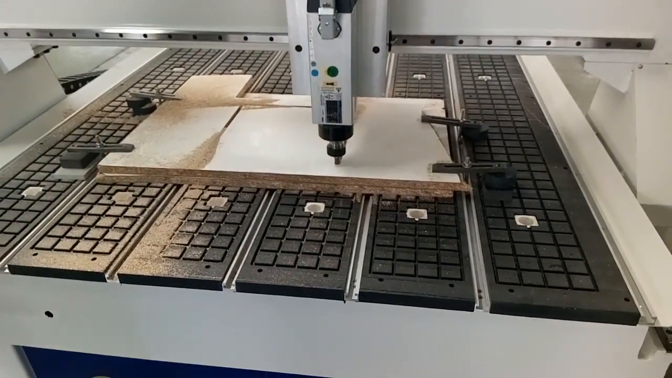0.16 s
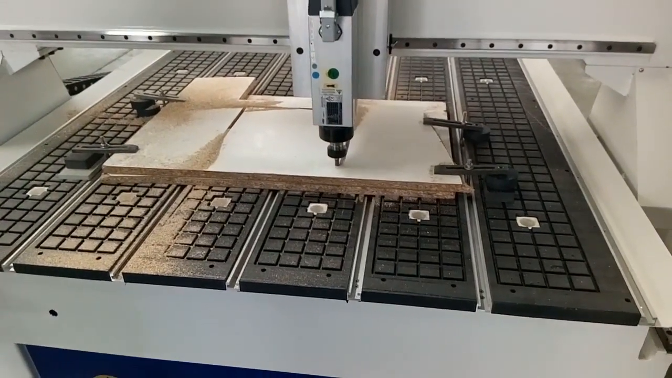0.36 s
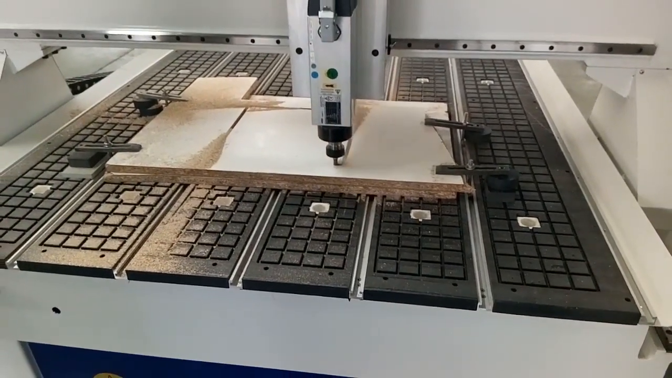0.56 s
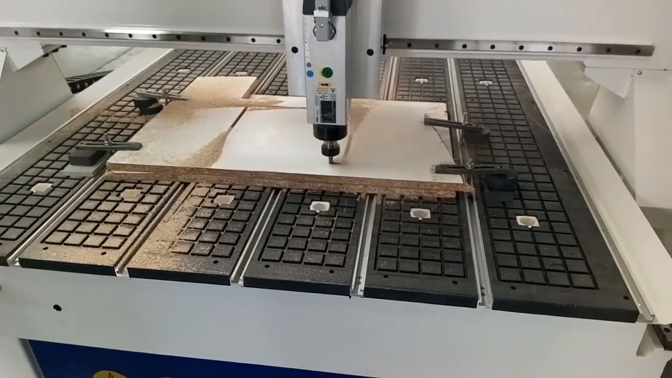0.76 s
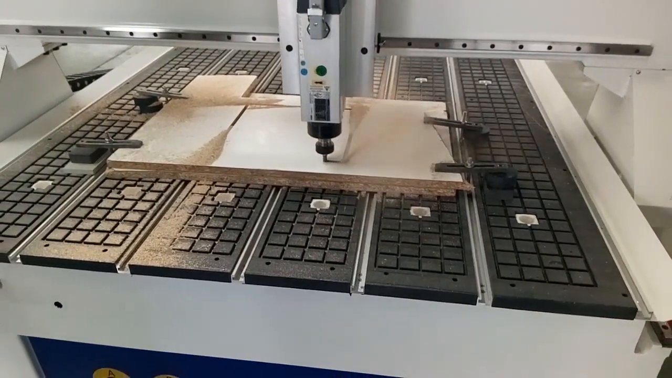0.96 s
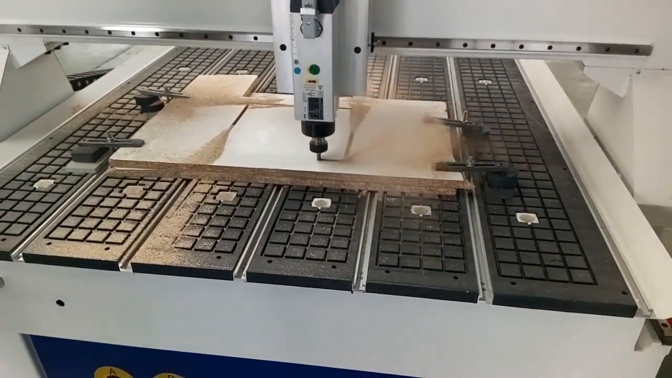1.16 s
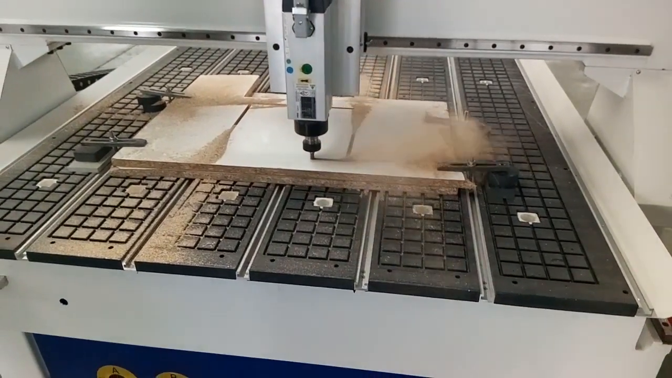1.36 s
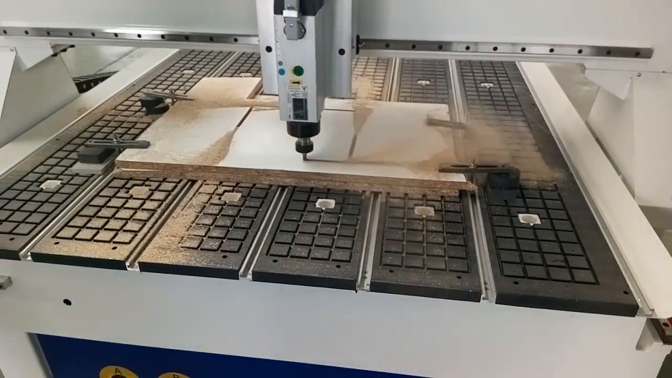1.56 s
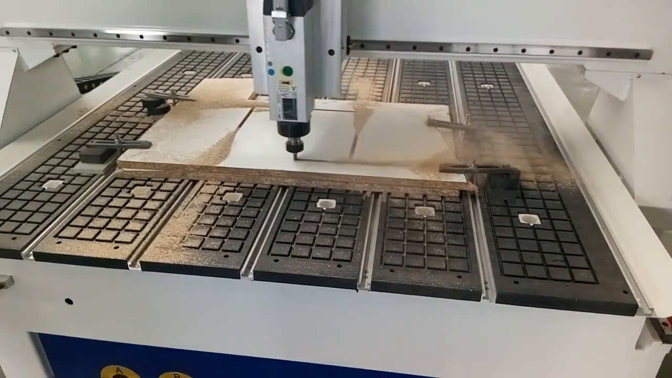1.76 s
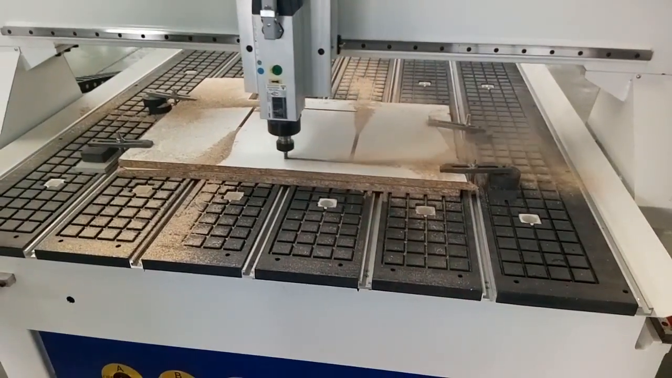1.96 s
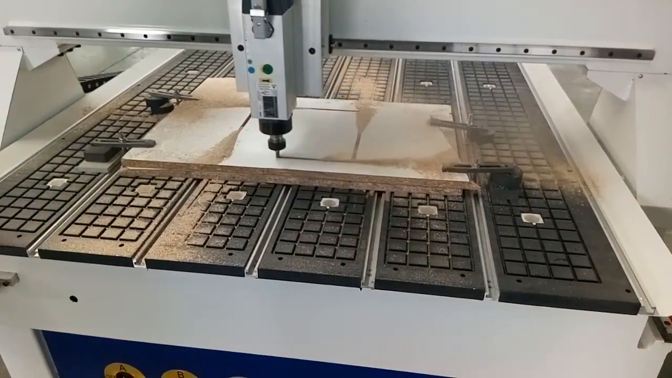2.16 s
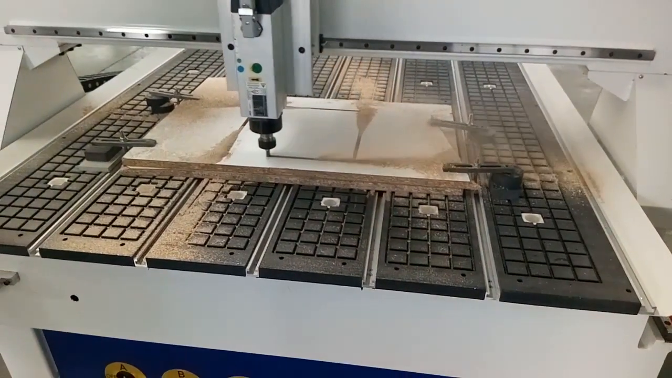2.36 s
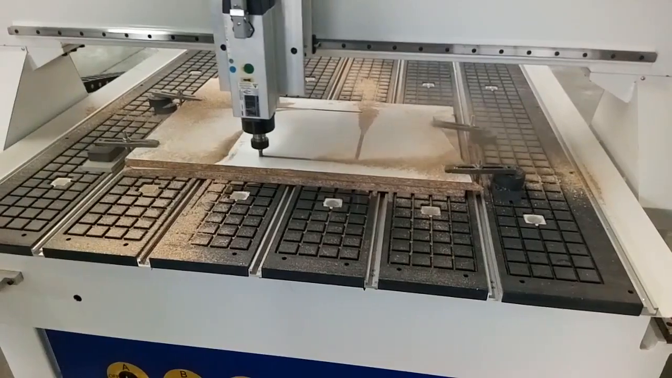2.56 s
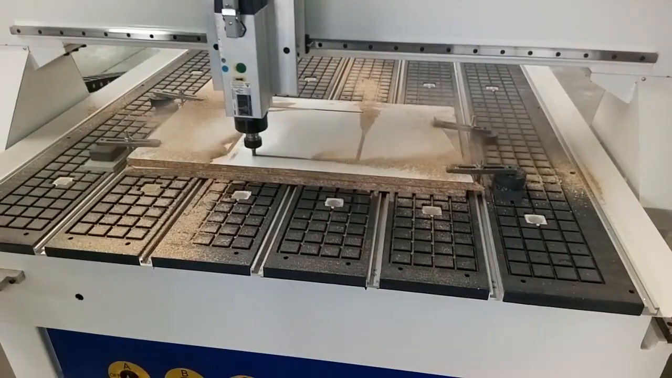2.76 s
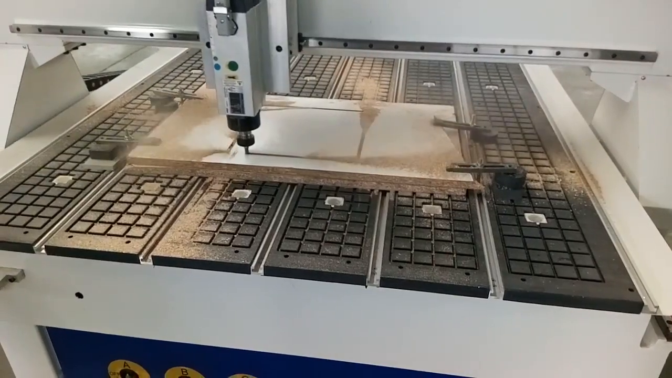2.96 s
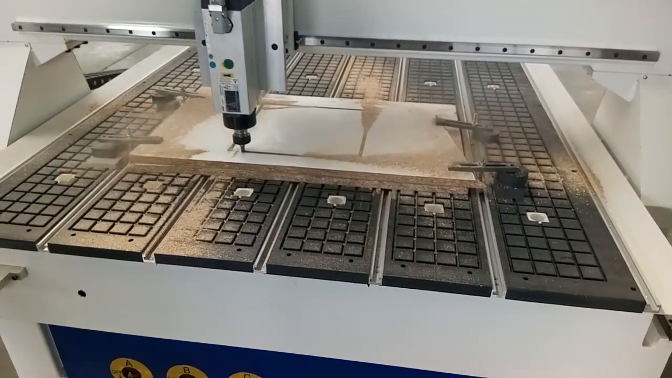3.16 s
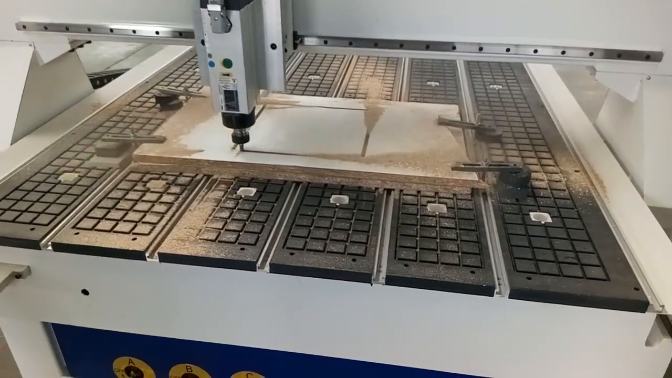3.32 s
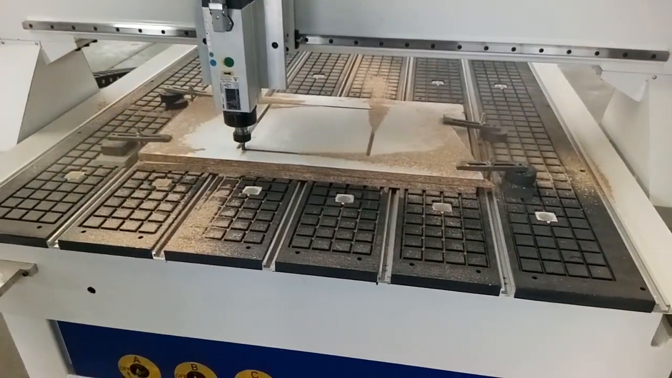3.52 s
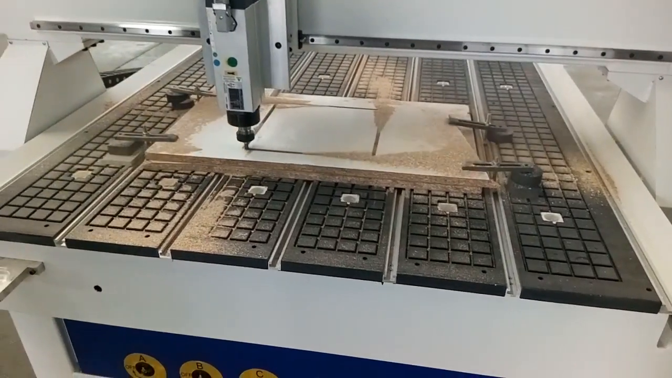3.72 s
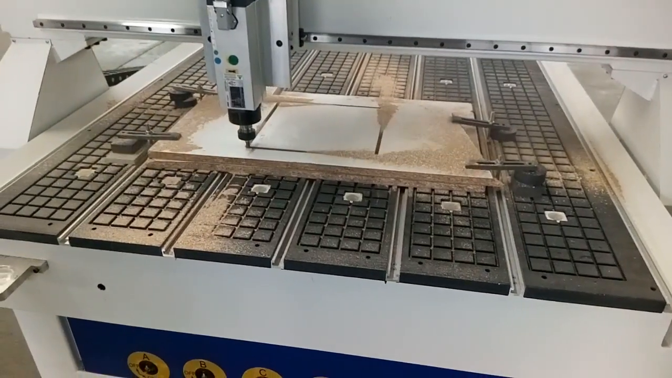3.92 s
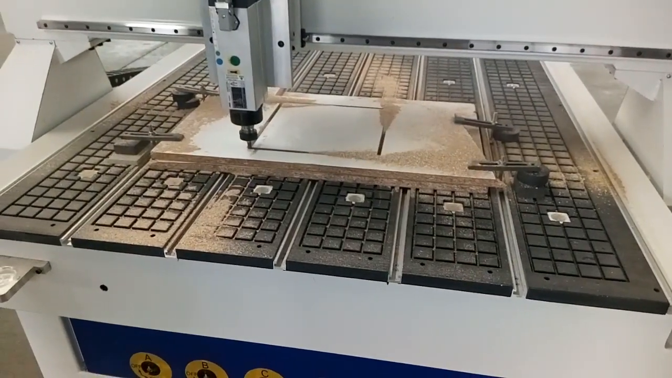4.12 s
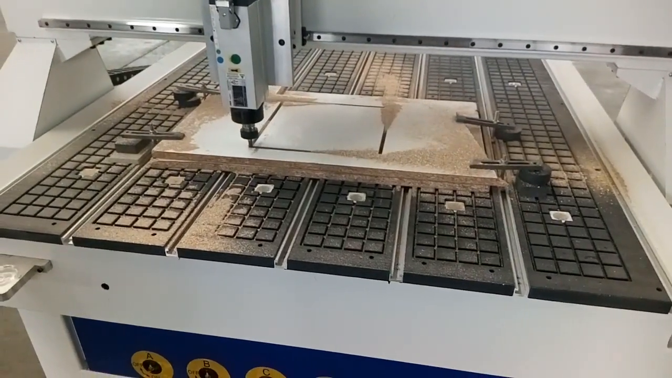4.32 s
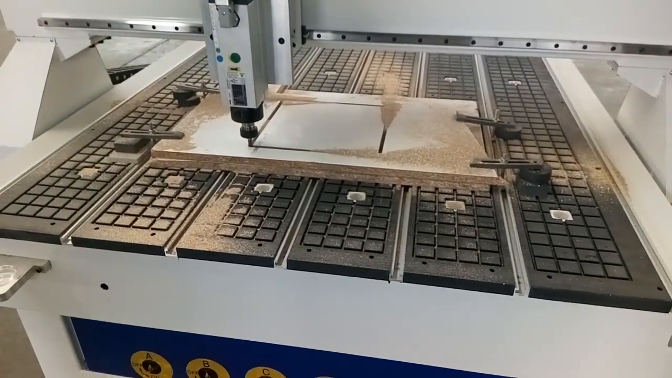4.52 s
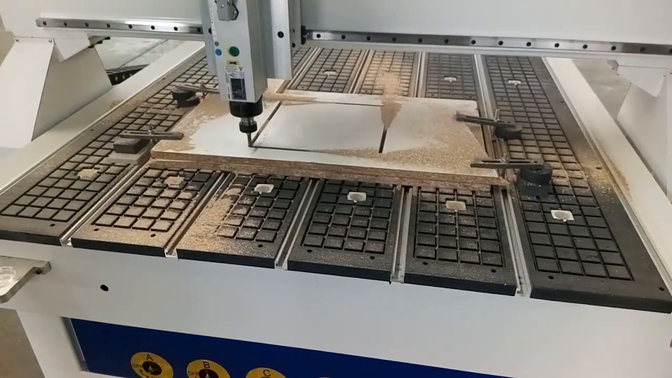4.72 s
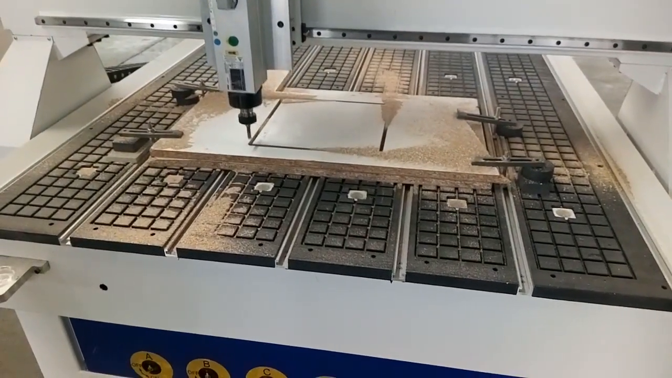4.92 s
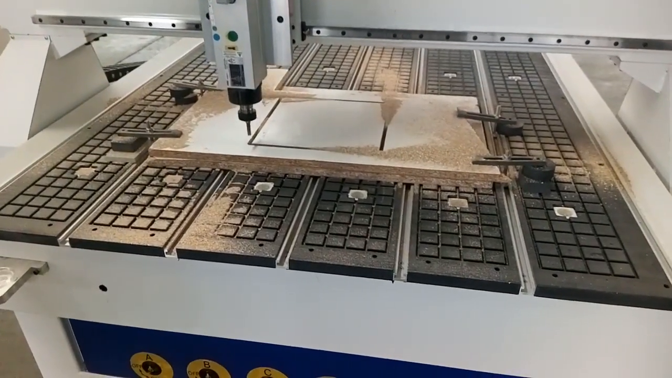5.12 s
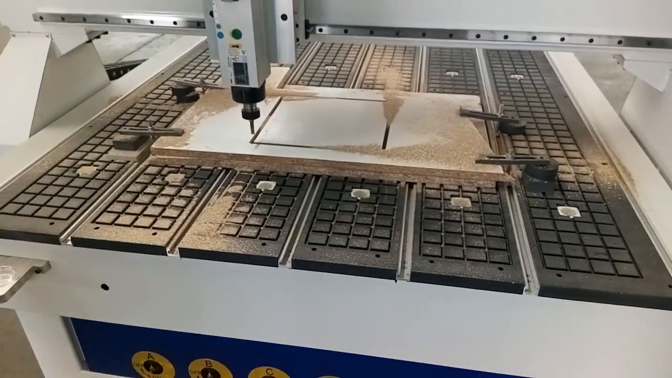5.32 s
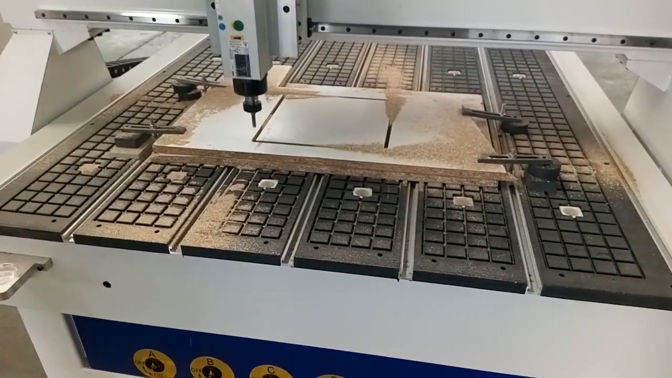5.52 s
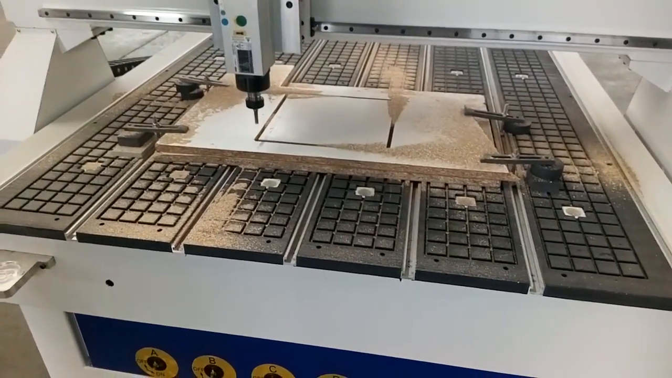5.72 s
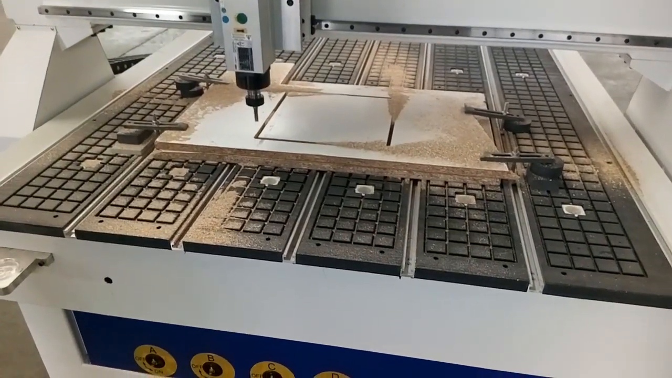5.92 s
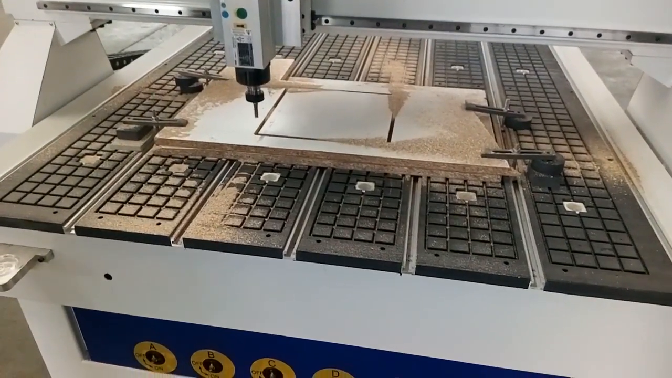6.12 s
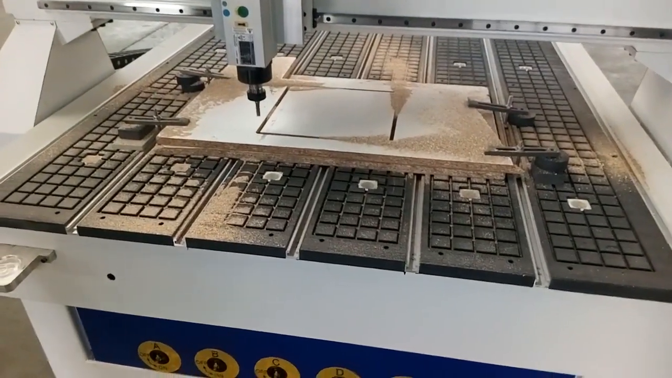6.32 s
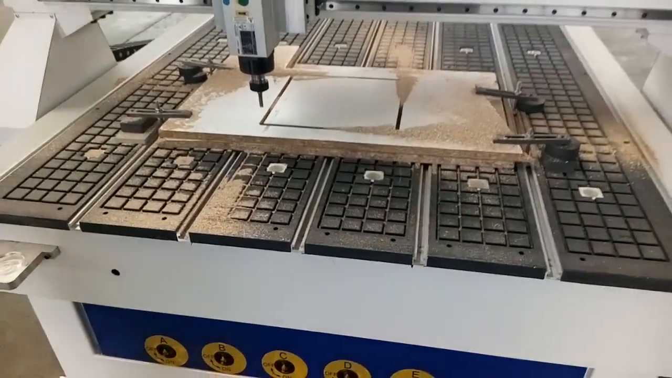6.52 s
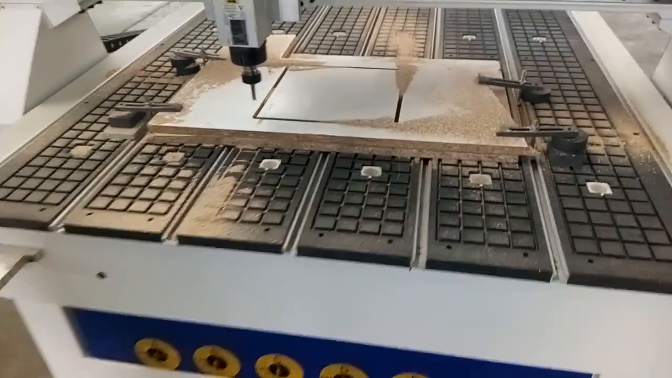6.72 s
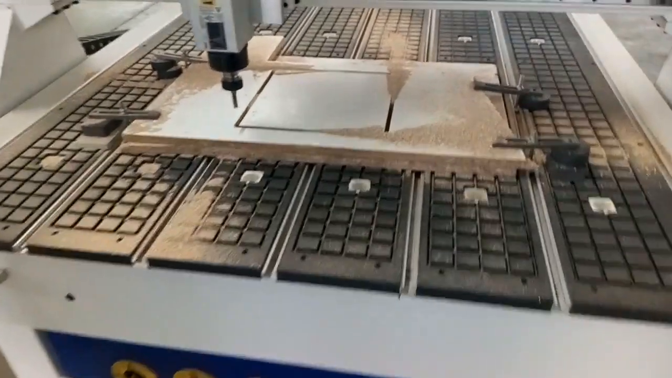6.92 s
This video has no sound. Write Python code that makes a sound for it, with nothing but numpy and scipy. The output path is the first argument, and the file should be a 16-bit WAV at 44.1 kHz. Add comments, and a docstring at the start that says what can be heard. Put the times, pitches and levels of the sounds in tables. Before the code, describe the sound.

Close, shrill machine squeal and gritty wood cutting, a brief stutter as the bit lets go, airy hiss, a falling spindle whine, final low bumps.

```python
"""A CNC router plunges a two-flute cutter into a board, then feeds it sideways, heard from close by in mono.
It squeals in its bending mode, with sidebands at multiples of the shaft rate, over a rasp of chip noise.
The feed stops, the squeal turns loose and stutters; the cutter lets go and grazes its groove as air hisses.
The spindle brakes, its falling fan whine beating against the room's echo, and the drive whistles faintly.
Last, the frame rumbles and bumps as the gantry moves off."""
import sys
import numpy as np
from scipy import signal
from scipy.fft import rfft, irfft, next_fast_len
from scipy.io import wavfile
from scipy.ndimage import uniform_filter1d, minimum_filter1d

SR = 44100
rng = np.random.default_rng(int(sys.argv[2]) if len(sys.argv) > 2 else 0)


def put_to_file(sound):
    """Save the sound as 16-bit audio at rate SR, in the file named by the first command-line argument."""
    columns = np.atleast_2d(sound).T  # one column per channel
    safe = np.clip(columns, -1, 1)
    whole_steps = np.round(safe * 32767)
    wavfile.write(sys.argv[1], SR, whole_steps.astype(np.int16))


N = 312212
TIME = np.arange(N) / SR

# job: plunge turns into feed, feed stops, cutter lets go, clears the groove, spindle brakes
FEED_S, STOP_S, LET_GO_S, CLEAR_S, BRAKE_S = 0.52, 3.83, 4.125, 4.5, 5.42

# fan and workshop drone spectrum: (frequency [Hz], relative level [dB])
DRONE_COLOUR = [(30, -19), (55, -9), (120, 0.5), (230, -2), (420, -7), (680, -5.5), (1050, -7), (1800, -10),
                (4000, -8.5), (6700, -3.5), (7700, -19), (9200, -31.5), (13900, -42), (14900, -27.5)]
# housing resonances rung by air: (frequency [Hz], width [Hz], relative level [dB])
HOUSING = [(103.2, 36, -5), (210, 19, -4.5), (651, 190, 0), (1432, 160, -2.5), (2165, 270, -1),
           (2665, 27, -9), (3693, 66, -4.5)]
# drone gain, dipped until about 4 s
DRONE_DB, DRONE_DIP_DB, DRONE_BACK_S, DRONE_RISE_S = -25, -16, 4.03, 0.52
# air blowing across the fresh groove: (time [s], level [dB])
HISS = [(3.8, -56), (4.05, -25.5), (4.42, -21), (4.85, -23), (5.15, -21), (5.55, -28), (5.8, -40),
        (7.08, -57)]
# hiss spectrum: (frequency [Hz], relative level [dB])
HISS_COLOUR = [(1500, -19), (2300, -7.5), (3600, -9.5), (4800, -0.5), (5600, -2), (6500, 2.5), (7200, -3.5),
               (8000, -15.5), (10000, -29), (13800, -34), (15000, -22)]

# frame rumble spectrum: (frequency [Hz], relative level [dB])
GANTRY_COLOUR = [(40, -19), (110, -3), (170, 8), (270, -8), (340, 6.5), (420, 4.5), (520, -3), (900, -25),
                 (3000, -55)]
# bumps in the rumble: (time [s], half length [s], rise [dB])
BUMPS = [(6.868, .03, 5.5), (7.032, 0.026, 12.5)]
GANTRY_S, GANTRY_DB = 6.73, -32.8

# drive switching whistles: (time [s], length [s], pitch [Hz], glide [Hz/s], level [dB])
WHISTLE = [(6.18, .17, 8270, 4800, -59), (6.54, .6, 8920, -1330, -58)]

# spindle speed before braking, sagging under load: (time [s], shaft rate [Hz])
SPEED = [(0, 258.3), (.2, 260.4), (.45, 260), (.6, 258.5), (1, 256.2), (1.4, 255.9), (1.95, 253.1),
         (2.6, 253), (3, 254.8), (3.78, 258), (4.2, 261.4), (5.4, 262.6)]
IDLE_HZ, BRAKE_STEP_HZ, BRAKE_HZ_PER_S = 262.2, 1.3, 29.3
# shaft imbalance, order 1: (time [s], level [dB])
IMBALANCE = [(0, -56.5), (.65, -51.5), (.85, -41), (1.9, -37.5), (2.95, -53.5), (3.2, -38), (3.5, -35.5),
             (3.85, -52), (4.18, -29.5), (5.3, -32), (5.9, -38), (7.08, -45)]
# flutes' note, order 2, swelling and fading as the head travels: (time [s], level [dB])
FLUTES = [(0, -36), (.55, -29.5), (.88, -29.5), (1.18, -45), (1.4, -34), (1.95, -29), (2.2, -46),
          (2.35, -34.5), (2.67, -42.5), (3.25, -24.5), (3.92, -27.5), (4.05, -34.5), (4.6, -43), (5.7, -48),
          (5.9, -36), (7.08, -51)]
# flutes' octave, order 4: (time [s], level [dB])
FLUTE_OCTAVE = [(.3, -51), (1.15, -35), (1.98, -32), (2.25, -55), (2.5, -40.5), (3.5, -38), (3.8, -49.5),
                (3.92, -38.5), (4.4, -36.5), (4.6, -54), (7.08, -53)]
# flutes' double octave, order 8: (time [s], level [dB])
FLUTE_TOP = [(.3, -53), (1.2, -31), (1.55, -45), (1.98, -31), (2.32, -29.5), (2.65, -50), (2.95, -34),
             (3.85, -34.5), (4.03, -41), (4.35, -33.5), (4.55, -46), (7.08, -49)]
# fan whine, order 6: (time [s], level [dB])
FAN = [(0, -40.5), (.5, -36.5), (.82, -29), (1.45, -41.5), (3.8, -34), (3.93, -28.5), (4.03, -29.5),
       (4.17, -22.5), (4.45, -29), (4.8, -25), (5, -37.5), (5.2, -28.5), (5.43, -25.5), (5.48, -19.5),
       (6.18, -20.5), (6.5, -36.5), (7.08, -39)]
# fan octave, order 12: (time [s], level [dB])
FAN_OCTAVE = [(.42, -42), (.53, -33.5), (.95, -27.5), (1.45, -41.5), (3.45, -33.5), (3.75, -46),
              (4.4, -31.5), (5.6, -31), (5.85, -28.5), (6.2, -43), (6.6, -32.5), (7.08, -51)]

# tones of the grazing cutter: (shaft order, relative level [dB])
BRUSH_TONES = [(16, -2), (17, -5), (18, 0.5), (19, -1), (20, -5.5), (22, -6), (24, 0)]

# chip noise spectrum: (frequency [Hz], relative level [dB])
RASP_COLOUR = [(150, -26), (600, -13), (1100, -20), (1680, -19.5), (2350, -8.5), (2900, -13), (3900, -8.5),
               (4600, -4.5), (5400, -10), (6700, -2.5), (7600, -11.5), (9000, -29.5), (13900, -41.5),
               (14900, -22)]
# board and cutter resonances: (frequency [Hz], width [Hz], relative level [dB])
BOARD = [(149, 30, -16), (2300, 1400, -4.5), (4070, 200, -8), (4850, 730, 4.5), (6630, 810, -1.5)]
# overtones of the flutes' blows: (shaft order, relative level [dB])
BLOWS = [(5, -33.5), (7, -34.5), (9, -30.5), (10, -18), (14, -16), (16, -17), (18, -16), (20, -31),
         (22, -19.5), (24, -21), (26, -28), (28, -30)]
# cutting gain: rises with the speed sag, lower in the plunge
RASP_DB, RASP_DB_PER_HZ, PLUNGE_DB = -26, 0.4432, -1.5
RASP_END_S, RASP_FADE_S = 4.21, 0.61
HARD_SPOT_S, HARD_SPOT_WIDTH_S, HARD_SPOT_DB = 1.903, 0.13, 3

# cutter's bending mode before it turns loose: (time [s], pitch [Hz])
CHATTER = [(0, 4796), (.35, 4798), (.48, 4816), (1, 4790), (1.5, 4795), (1.9, 4784), (2.8, 4782),
           (3.2, 4796), (3.81, 4797)]
# squeal at that mode: (time [s], level [dB])
SQUEAL = [(0.0, -8.5), (0.13, -10), (0.43, -7), (0.63, -15.5), (0.69, -12), (0.86, -14), (0.9, -12.5),
          (1.43, -10), (1.79, -14), (1.86, -18.5), (2.0, -12.5), (2.15, -12), (2.32, -18), (2.4, -13),
          (2.79, -11), (3.13, -14), (3.68, -9.5), (3.8, -10.5)]
# loose cutter catching the wall: (time [s], length [s], level [dB], level slope [dB/s])
CATCHES = [(3.865, 0.07, -16.5, -8), (3.94, 0.13, -15, -50), (4.158, 0.32, -26, -32)]
# (orders from mode, level plunging [dB], feeding [dB], as feed stops [dB], as cutter lets go [dB])
INNER_SIDEBANDS = [(-2, -29.5, -24.5, -29, -25), (-1, -30.5, -32.5, -30, -18.5), (2, -24, -22, -22, -28.5),
                   (4, -28, -29.5, -35, -39)]
# sideband six orders up: (time [s], level [dB])
BRIGHT_SIDEBAND = [(0, -22.5), (.9, -21.5), (1.3, -26.5), (1.75, -19), (2.1, -20.5), (2.6, -37), (3.1, -36),
                   (3.45, -22.5), (3.88, -40), (3.97, -23), (4.12, -28)]
# outer sidebands: (shaft orders from mode, relative level [dB])
SIDEBANDS = [(-10, -30), (-8, -34), (-6, -25.5), (-4, -25), (-3, -46), (1, -25), (3, -26), (5, -24),
             (7, -23), (8, -16), (9, -35.5), (10, -22), (11, -34), (12, -36), (13, -41), (14, -37)]
# lines around twice the mode: (shaft orders from there, relative level [dB])
OVERTONES = [(-4, -43), (-2, -52), (-1, -60), (0, -49), (1, -52), (2, -57), (3, -58), (4, -64), (6, -48.5),
             (7, -61), (8, -55.5), (9, -54), (10, -57)]
# pitch steps up when loose, then rises until the cutter lets go
LOOSE_STEP_HZ, LOOSE_RISE_HZ = 33.8, 57.75
# the squeal dips briefly
DIP_S, DIP_WIDTH_S, DIP_DB = 3.2, 0.012, -6.5

PEAK_LIMIT, LIMITER_S, TOP_HZ = 0.9, 0.003, 15480


def undb(db):
    """Decibels to gain."""
    return 10 ** (np.asarray(db) / 20)


def curves(table):
    """Each column after time as a signal, joined by straight lines."""
    s, *columns = np.transpose(table)
    return [np.interp(TIME, s, column) for column in columns]


def ramp(at, length):
    """Linear change from 0 to 1, centred on a moment."""
    return np.clip((TIME - at) / length + 0.5, 0, 1)


def held(start, end, attack, release):
    """Attack, hold and release, from 0 to 1 and back."""
    return ramp(start, attack) * (1 - ramp(end, release))


def swell(at, width):
    """Bell-shaped rise to 1 around a moment."""
    return np.exp(-((TIME - at) / width) ** 2)


def unit(x):
    """Scale to rms 1."""
    return x / np.sqrt(np.mean(x ** 2))


def walk(rate_hz):
    """Smooth random wandering of rms 1."""
    k = max(int(SR / rate_hz), 2)
    steps = np.repeat(rng.standard_normal(N // k + 2), k)
    return unit(uniform_filter1d(steps, k)[:N])


def noise(gain):
    """Noise of rms 1 whose amplitude spectrum follows gain(Hz)."""
    size = next_fast_len(N)
    hz = np.maximum(np.arange(size // 2 + 1) * SR / size, 1)
    spectrum = rfft(rng.standard_normal(size)) * gain(hz)
    return unit(irfft(spectrum, size)[:N])


def coloured(points):
    """Noise with a spectrum joining (frequency [Hz], level [dB]) points."""
    f, db = np.transpose(points)
    return noise(lambda hz: undb(np.interp(np.log(hz), np.log(f), db)))


def resonant(modes):
    """Noise ringing in (frequency [Hz], width [Hz], level [dB]) resonances."""
    def gain(hz):
        power = sum(undb(db) ** 2 / w / (1 + (2 * (hz - f) / w) ** 2) ** 2 for f, w, db in modes)
        return np.sqrt(power)
    return noise(gain)


def angle(hz):
    """Running phase [rad] of something that turns at hz."""
    return 2 * np.pi * np.cumsum(hz) / SR


def tone(phase, db):
    """Sine at an rms level, with a random starting phase."""
    return np.sqrt(2) * undb(db) * np.sin(phase + 2 * np.pi * rng.random())


def stack(base, shaft, rows, fade_db, fade_rate_hz):
    """Lines whole shaft orders from a base phase, each fading on its own."""
    return sum(tone(base + round(order) * shaft, db + fade_db * np.tanh(walk(fade_rate_hz)))
               for order, db in rows)


def air(housing_db=-6.0, flicker_db=0.7, plunge_db=3.5, thin_hz=110, thin_share=0.55):
    """Fan air drones and rings the housing, held low and thin until about 4 s; air hisses over the groove."""
    drone = coloured(DRONE_COLOUR) * undb(flicker_db * walk(12)) + undb(housing_db) * resonant(HOUSING)
    dipped = 1 - ramp(DRONE_BACK_S, DRONE_RISE_S)
    lows = signal.sosfilt(signal.butter(1, thin_hz, fs=SR, output="sos"), drone)
    drone = drone - thin_share * dipped * lows
    drone_db = DRONE_DB + DRONE_DIP_DB * dipped + plunge_db * (1 - ramp(0.23, 0.5))
    hiss = coloured(HISS_COLOUR) * undb(flicker_db * walk(24.77))
    return undb(drone_db) * drone + undb(curves(HISS)[0]) * hiss


def gantry(judder_db=1.5):
    """The drive shakes the frame as the gantry starts to travel: low noise with bumps."""
    bumps_db = sum(db * swell(s, width) for s, width, db in BUMPS)
    level_db = GANTRY_DB + bumps_db + judder_db * walk(30)
    return coloured(GANTRY_COLOUR) * ramp(GANTRY_S, 0.11) * undb(level_db)


def drive():
    """Switching in the spindle's motor drive whistles in thin glides."""
    return sum(held(s, s + length, 0.05, 0.05) * tone(angle(hz + glide * (TIME - s)), db)
               for s, length, hz, glide, db in WHISTLE)


def room(x, t60_s=1.78, gap_s=0.025):
    """Diffuse late echoes of the workshop: a decaying noise tail of unit energy."""
    t = TIME[:SR]
    tail = rng.standard_normal(SR) * undb(-60 * t / t60_s) * (t > gap_s)
    return signal.fftconvolve(x, tail / np.sqrt(np.sum(tail ** 2)))[:N]


def speed():
    """Shaft rate [Hz]: sags in the cut, then is braked by a small step and a steady fall."""
    step = BRAKE_STEP_HZ * ramp(BRAKE_S + 0.059, 0.13)
    fall = BRAKE_HZ_PER_S * np.maximum(TIME - BRAKE_S, 0)
    return curves(SPEED)[0] - step - fall


def spindle(shaft, flutter_db=1.5, echo_db=-11.5):
    """Imbalance, flutes and fan sing on multiples of the shaft rate."""
    voices = [(1, IMBALANCE), (2, FLUTES), (4, FLUTE_OCTAVE), (8, FLUTE_TOP), (6, FAN), (12, FAN_OCTAVE)]
    whine = sum(tone(k * shaft, curves(table)[0] + flutter_db * walk(35)) for k, table in voices)
    # as the pitch falls, the echo still holds the higher pitch and beats against it
    braking = ramp(BRAKE_S + 0.02, 0.04)
    return whine + undb(echo_db) * room(whine * braking)


def brushing(shaft, graze_db=-29.5, fall_db_per_s=-18, jitter_rad=0.5):
    """The rising cutter grazes its groove ever more lightly: jittered shaft orders, fading."""
    fading = undb(graze_db + fall_db_per_s * np.maximum(TIME - LET_GO_S, 0))
    tones = stack(jitter_rad * walk(110), shaft, BRUSH_TONES, fade_db=4.0, fade_rate_hz=60)
    return fading * held(LET_GO_S, CLEAR_S, 0.097, 0.089) * tones


def cutting(shaft, sag_hz, bite=0.38, grain_db=1.0, board_db=-5.5, chips_db=-2.0,
            blows_db=2.0, blows_plunge_db=-5, repeat=0.32):
    """Two bites a turn tear off chips: puffs of noise that ring the board, and overtones of the blows."""
    puffs = unit(1 + bite * np.cos(2 * shaft)) * undb(grain_db * walk(90))
    rasp = undb(chips_db) * coloured(RASP_COLOUR) + undb(board_db) * resonant(BOARD)
    # similar grain each turn gathers the noise around shaft multiples
    turn_before = np.searchsorted(shaft, shaft - 2 * np.pi)
    rasp = (rasp + repeat * rasp[turn_before]) / np.hypot(1, repeat)
    plunging = 1 - ramp(FEED_S, 0.094)
    hard_spot_db = HARD_SPOT_DB * swell(HARD_SPOT_S, HARD_SPOT_WIDTH_S)
    cut_db = RASP_DB + RASP_DB_PER_HZ * sag_hz + PLUNGE_DB * plunging + hard_spot_db
    blows = stack(0, shaft, BLOWS, fade_db=5.5, fade_rate_hz=4.07)
    blows = undb(blows_db + blows_plunge_db * plunging) * blows
    in_board = 1 - ramp(RASP_END_S, RASP_FADE_S)
    return undb(cut_db) * in_board * (rasp * puffs + blows)


def chatter(shaft, shake_db=0.5, sideband_shake_db=1.0, jitter_rad=0.042, loose_db=1.6,
            loose_jitter_rad=0.35, lag_rad=0.22, fade_db=2.5, outer_db=-16.5, outer_plunge_db=-8,
            outer_loose_db=-6, overtones_db=-10.5):
    """The cutter vibrates in its bending mode; each flute's bite modulates it, and the grain shakes it."""
    fed, loose = ramp(FEED_S, 0.088), ramp(STOP_S, 0.023)
    touching = 1 - ramp(LET_GO_S, 0.018)
    lifted = np.clip((TIME - STOP_S) / (LET_GO_S - STOP_S), 0, 1)
    stiffer_hz = LOOSE_STEP_HZ * loose + LOOSE_RISE_HZ * lifted * touching
    mode = angle(curves(CHATTER)[0] + stiffer_hz)
    mode = mode + (jitter_rad + loose_jitter_rad * loose) * walk(120)

    swing = undb(curves(SQUEAL)[0]) * (1 - loose)
    for s, length, db, slope in CATCHES:
        catch_db = db + slope * np.clip(TIME - s, 0, length)
        swing = swing + undb(catch_db) * held(s, s + length, 0.023, 0.02)
    squeal = swing * undb(shake_db * walk(60)) * np.sin(mode)

    sidebands = [(6, curves(BRIGHT_SIDEBAND)[0])]
    for k, plunging, feeding, stopping, leaving in INNER_SIDEBANDS:
        loose_level = stopping + (leaving - stopping) * lifted
        db = plunging * (1 - fed) + feeding * (fed - loose) + loose_level * loose
        sidebands.append((round(k), db + fade_db * np.tanh(walk(4.017))))
    for k, db in sidebands:
        # phase-locked to the bites, lagging more the further from the mode
        gain = touching * undb(db + sideband_shake_db * walk(60))
        squeal = squeal + gain * np.sin(mode + k * shaft - lag_rad * k ** 2)

    outer_gain = undb(outer_db + outer_plunge_db * (1 - fed) + outer_loose_db * loose)
    outer = touching * outer_gain * stack(mode, shaft, SIDEBANDS, fade_db=1.5, fade_rate_hz=4.56)
    overtones = stack(2 * mode, shaft, OVERTONES, fade_db=3.5, fade_rate_hz=4)
    overtones = (1 - loose) * undb(overtones_db) * overtones
    # one brief dip; stutter once loose
    stutter_db = DIP_DB * swell(DIP_S, DIP_WIDTH_S) + loose_db * walk(70) * loose
    return (np.sqrt(2) * squeal + outer + overtones) * undb(stutter_db)


def scene():
    """One shaft, wobbling slightly, drives the tones; both channels are alike."""
    hz = speed()
    shaft = angle(hz * (1 + 0.00042 * walk(25.3)))
    background = air() + gantry() + drive()
    machine = spindle(shaft) + brushing(shaft)
    cut = cutting(shaft, IDLE_HZ - hz) + chatter(shaft)
    mono = background + machine + cut
    return np.array([mono, mono])


def record(dry):
    """A limiter smoothly turns down peaks above its limit; a steep low-pass cuts the top."""
    size = int(LIMITER_S * SR)
    allowed = PEAK_LIMIT / np.maximum(np.abs(dry), PEAK_LIMIT)
    gain = uniform_filter1d(minimum_filter1d(allowed, size), size)
    low_pass = signal.ellip(14, 0.2, 80, TOP_HZ, fs=SR, output="sos")
    return signal.sosfilt(low_pass, dry * gain)


dry = scene()
out = record(dry)
put_to_file(out)
```